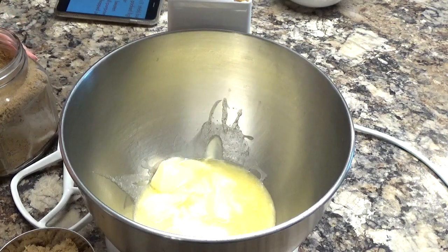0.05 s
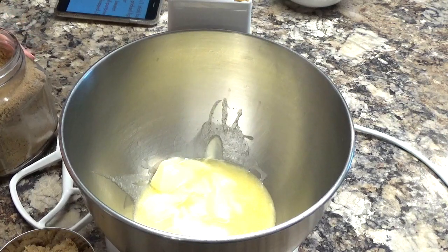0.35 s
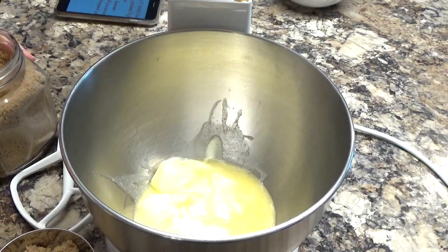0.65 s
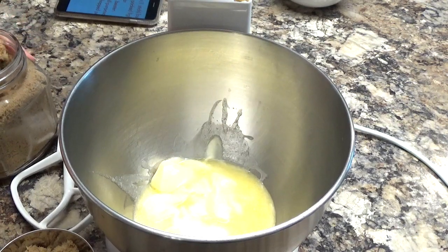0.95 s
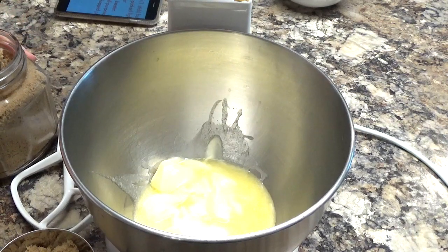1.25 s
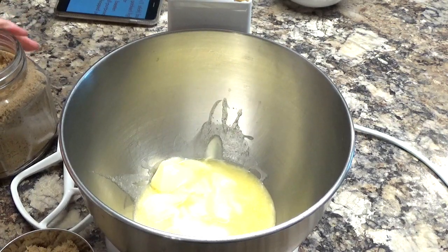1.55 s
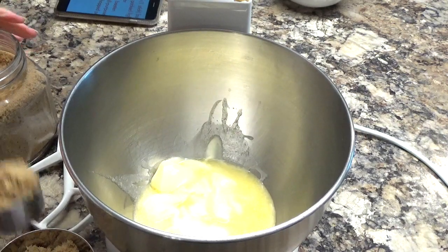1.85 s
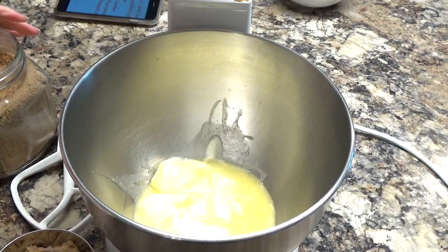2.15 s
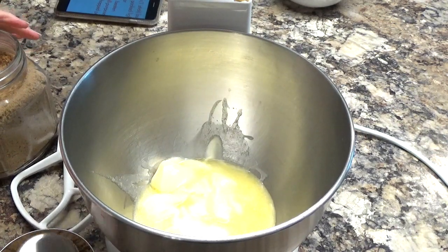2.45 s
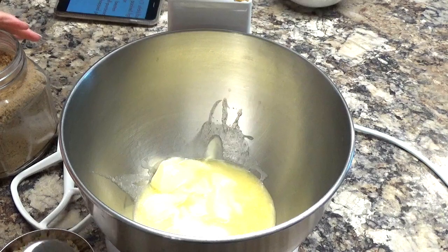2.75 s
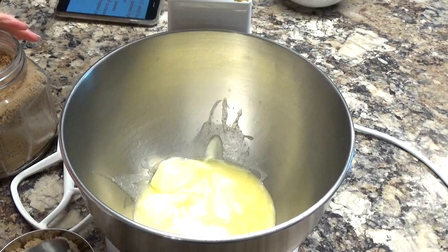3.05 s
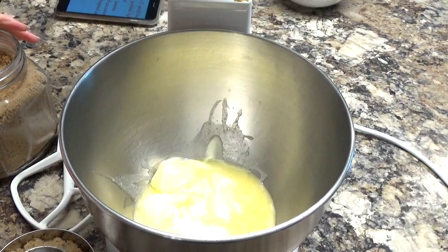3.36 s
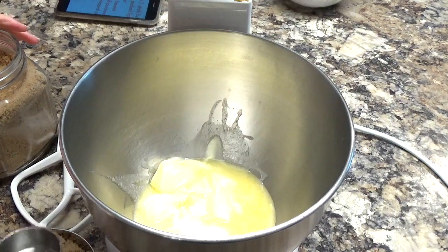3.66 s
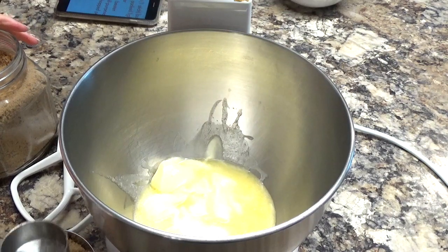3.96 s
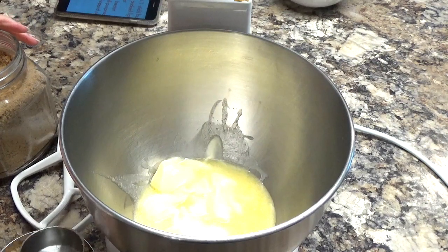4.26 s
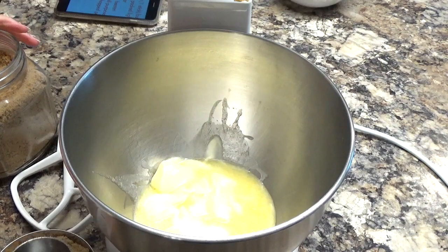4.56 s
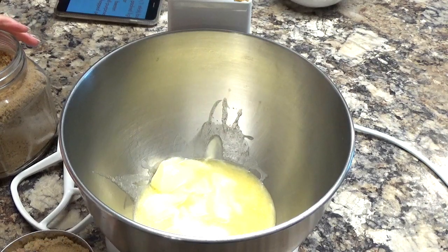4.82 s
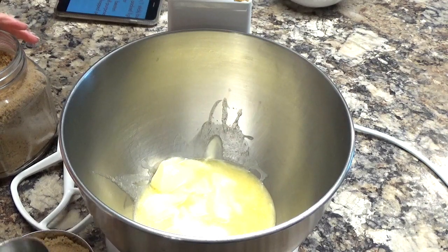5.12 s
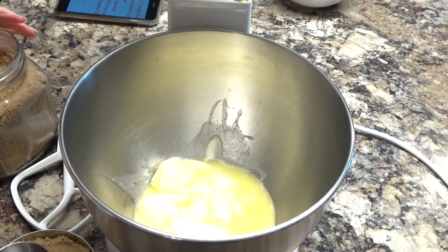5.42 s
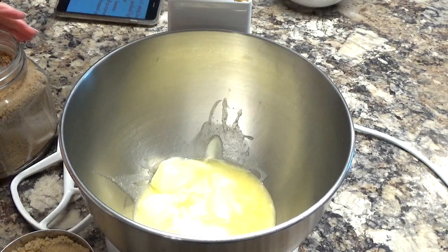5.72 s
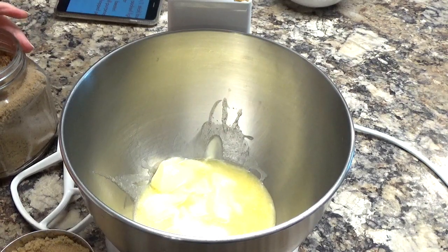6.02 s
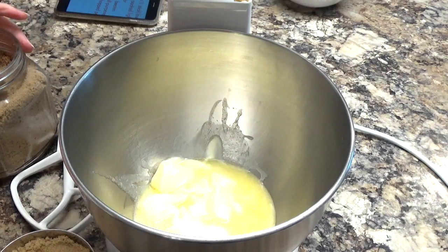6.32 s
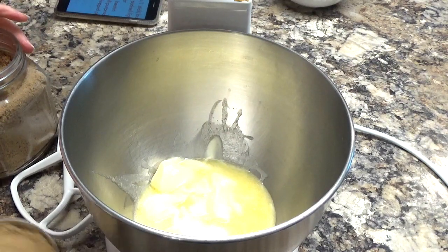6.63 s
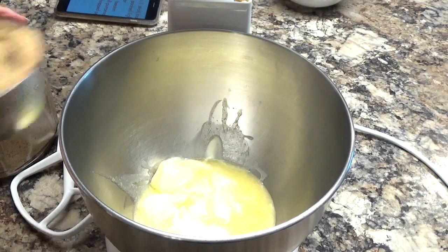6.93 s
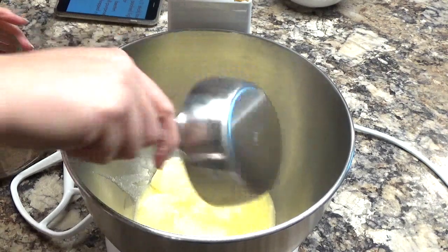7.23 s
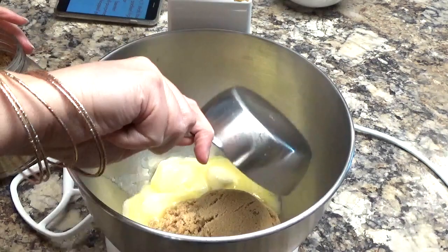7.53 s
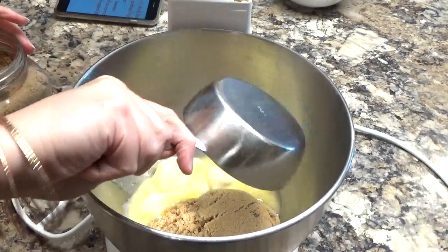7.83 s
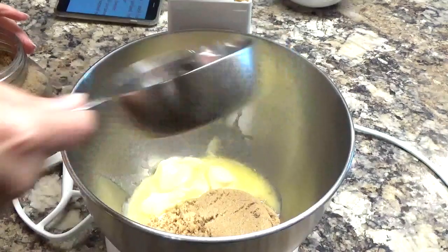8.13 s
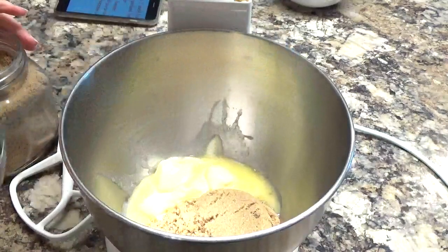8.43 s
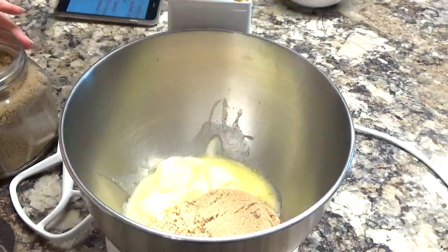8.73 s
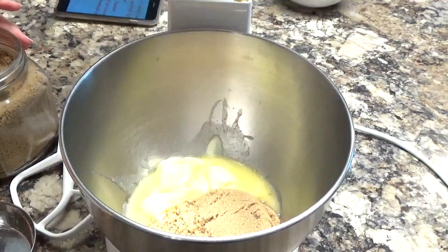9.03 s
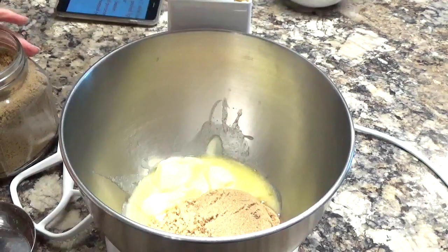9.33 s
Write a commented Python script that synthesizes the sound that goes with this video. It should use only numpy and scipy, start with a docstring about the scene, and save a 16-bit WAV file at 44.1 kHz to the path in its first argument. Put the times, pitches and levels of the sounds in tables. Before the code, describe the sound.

A steel measuring cup knocks, scrapes and clatters on a stone kitchen counter while thin bangles jingle and a glass jar thumps down.

```python
"""An appliance hums in a small kitchen. A steel measuring cup taps a glass jar of brown sugar, and the
jar thumps onto the stone counter. The cup clinks in its free modes; a scoop scrapes it by stick-slip
friction and grazes it, while thin bangles collide on the wrist. Pressed as the sugar is packed, the cup
knocks on the counter; it is tipped, and the sugar whispers out. At last the cup clatters down and rings.
The room reverberates throughout, and a limiter holds the loudest blows."""
import sys
import numpy as np
from scipy import signal
from scipy.fft import rfft, irfft, next_fast_len
from scipy.io import wavfile
from scipy.ndimage import uniform_filter1d, minimum_filter1d

SR = 44100
rng = np.random.default_rng(int(sys.argv[2]) if len(sys.argv) > 2 else 0)


def dump_mix(stems):
    """Bounce the given channels to the path in sys.argv[1] as a 16-bit WAV at rate SR."""
    frames = np.atleast_2d(stems).T  # one column per channel
    limited = np.clip(frames, -1, 1)  # hard clip at full scale
    pcm = np.round(limited * 32767).astype(np.int16)
    wavfile.write(sys.argv[1], SR, pcm)


N = 418068

# modes of the stone counter: (frequency [Hz], level [dB], t60 [s])
COUNTER_MODES = [(251, -6, 0.022), (332.4, -2.5, 0.13), (472, -6, 0.098), (662, -6, 0.048),
                 (857, -10.5, 0.034), (1132, -7.5, 0.022)]
# midrange clack of a blow on the counter: (frequency [Hz], spectral level [dB])
CLACK_SPECTRUM = [(120, -52), (300, -13), (650, 0.5), (1100, -1), (1700, -2.5), (2300, -2.5), (2900, -10.5),
                  (3300, -16.5), (6000, -24), (11000, -47)]
# bright crack of a hard contact: (frequency [Hz], spectral level [dB])
CRACK_SPECTRUM = [(500, -39), (2000, 8), (3700, 6), (5000, 4.5), (7000, 8), (9000, 4), (10000, -9),
                  (11000, -21)]
# modes of a middle-sized bangle: (frequency [Hz], level [dB], t60 [s])
BANGLE_MODES = [(2110, -23.5, 0.17), (4060, -14.5, 0.16), (6497, -2.5, 0.09), (9500, 3, 0.087)]
# pitch of each bangle against those modes: (frequency [ratio])
BANGLE_TUNINGS = [0.972, 0.987, 0.997, 1.007, 1.021, 1.032]
FIRM_DB, LOOSE_DB = .7, 3  # scatter of mode levels in firm blows and in loose touches


def amp(db):
    """Decibels as an amplitude ratio."""
    return np.exp(np.asarray(db) * (np.log(10) / 20))


def unit(x):
    """Normalisation to an rms of 1."""
    return x / np.sqrt(np.mean(x ** 2) + 1e-20)


def along(points, hz):
    """Interpolation of (frequency [Hz], value) points on a logarithmic axis."""
    frequencies, values = np.transpose(points)
    return np.interp(np.log(hz + 1), np.log(frequencies + 1), values)


def seconds(size):
    """Sample times [s]."""
    return np.arange(size) / SR


def pan(left_db):
    """A level difference between the channels sets the direction."""
    return amp([[left_db / 2], [-left_db / 2]])


def filtered(x, response):
    """Filtering multiplies the spectrum by a frequency response."""
    size = x.shape[-1]
    padded = next_fast_len(size + min(size // 8, 8192), real=True)
    hz = np.fft.rfftfreq(padded, 1 / SR)
    return irfft(rfft(x, padded) * response(hz), padded)[..., :size]


def noise(spectrum, size):
    """Spectral shaping turns white noise into coloured noise of rms 1."""
    return unit(filtered(rng.standard_normal(size), lambda hz: amp(along(spectrum, hz))))


def add(track, start_s, sound):
    """Superposition: a sound is summed into the track."""
    start = max(round(start_s * SR), 0)
    part = track[..., start:start + sound.shape[-1]]
    part += sound[..., :part.shape[-1]]


def ring(modes, scatter_db, size=SR // 3, tuning=1):
    """Free vibration is a sum of damped sinusoids; neighbouring modes start in opposite phase."""
    t = seconds(size)
    out = np.zeros(size)
    for k, (hz, db, t60) in enumerate(modes):
        envelope = amp(db + scatter_db * rng.standard_normal() - 60 * t / t60)
        out += (-1) ** k * envelope * np.sin(2 * np.pi * hz * tuning * t)
    return out


def burst(spectrum, t60, side_db, size=SR // 3):
    """Modes too dense to resolve act as decaying noise, mixed differently in each channel."""
    mid, side = noise(spectrum, (2, size)) * amp([[0], [side_db]])
    return unit(np.array([mid + side, mid - side])) * amp(-60 * seconds(size) / t60)


def ticks(size, uneven_db):
    """Many tiny contacts of uneven strength sum to a spiky random force."""
    return unit(rng.standard_normal(size) * amp(uneven_db * rng.exponential(size=size)))


def driven(force, response):
    """Forced vibration: the force is convolved with an impulse response scaled to unit energy."""
    response = np.atleast_2d(response)
    return signal.oaconvolve(force[None], response / np.linalg.norm(response[0]), axes=1)[:, :N]


def background():
    """Room noise, coherent between the channels in the bass, lies under an appliance's steady tones."""
    # room air: (frequency [Hz], spectral level [dB])
    air_spectrum = [(15, -77), (25, -25.5), (69, -7), (124, -1), (165, -16.5), (223, -18.5), (296, -11),
                    (444, -22.5), (480, -18), (545, -21.5), (759, -24), (1950, -34.5), (2210, -36),
                    (4990, -39.5), (11000, -44.5), (14300, -118), (22000, -120)]
    # likeness of left and right: (frequency [Hz], correlation [0-1])
    coherence = [(60, 0.99), (170, 1), (500, 0.95), (1430, 0.36), (4130, 0.5), (11900, 0.75)]
    # appliance tones: (frequency [Hz], rms level [dB])
    hum_tones = [(120, -52), (298, -65), (480, -62.5)]

    def mid_side_gains(hz):
        angle = np.arccos(np.clip(along(coherence, hz), -1, 1)) / 2
        return np.array([np.cos(angle), np.sin(angle)])

    mid, side = filtered(noise(air_spectrum, (2, N)), mid_side_gains)
    hum = sum(amp(db) * np.sqrt(2) * np.sin(2 * np.pi * hz * seconds(N)) for hz, db in hum_tones)
    return amp(-45.5) * np.array([mid + side, mid - side]) + hum


def glass_taps():
    """Inelastic rebound: the cup's rim taps the jar and touches twice more, each time more lightly."""
    # rim on glass: (time [s], level [dB], flight time [s])
    taps = [(0.385, -40.5, 0.0053), (0.532, -43, 0.0018), (5.227, -54.5, 0.0026), (5.408, -52, .003),
            (6.045, -19.5, 0.024), (9.274, -29.5, .012), (9.409, -26, 0.0083)]
    # resonances of the glass: (frequency [Hz], spectral level [dB])
    glass = [(500, -4.5), (1400, -6), (1690, 6), (1950, -22), (2300, 12.5), (2750, 8), (3100, -1),
             (5000, -11.5), (7000, -7.5), (9100, -1.5), (10500, -21)]
    fade_db_per_s = 312
    out = np.zeros((2, N))
    for start, db, flight in taps:
        for delay in (0, flight, 2 * flight):
            tap = burst(glass, t60=0.032, side_db=-14, size=SR // 10)
            add(out, start + delay, amp(db - fade_db_per_s * delay) * tap)
    return out


def jar():
    """Impact excitation: the heavy jar thuds in low, damped modes, with a clack and a glassy crack."""
    # it lands on its edge, falls flat and rocks back: (time [s], level [dB])
    blows = [(.848, -10), (0.8565, -5.5), (.869, 0)]
    # modes of the thud: (frequency [Hz], level [dB], t60 [s])
    thud_modes = [(88, -26, 0.19), (173, -49, 0.19), (257, -2, 0.028), (318, 2.5, 0.039),
                  (575, -8.5, 0.038), (770, -6, 0.013)]
    out = np.zeros((2, N))
    for start, db in blows:
        add(out, start, amp(db) * ring(thud_modes, FIRM_DB))
        add(out, start, amp(db - 17) * burst(CLACK_SPECTRUM, t60=0.042, side_db=-6))
        add(out, start, amp(-38.5) * burst(CRACK_SPECTRUM, t60=0.06, side_db=-8.5))
    return out


def contact(thud_db, clack_db, crack_db, clack_t60):
    """Steel's impact excites the counter's modes, pitched slightly at random; the treble dies first."""
    thud = ring(COUNTER_MODES, FIRM_DB, tuning=1 + 0.013 * rng.standard_normal())
    thud *= 1 - np.exp(-seconds(len(thud)) / 0.0012)
    clack = burst(CLACK_SPECTRUM, clack_t60, side_db=-9)
    crack = burst(CRACK_SPECTRUM, t60=0.0097, side_db=-7)
    return amp(thud_db) * thud + amp(clack_db) * clack + amp(crack_db) * crack


def drops():
    """Restitution: dropped steel bounces once, and the second contact rattles on."""
    # falls: (time [s], thud [dB], clack [dB], crack [dB], flight time [s], bounce gain [dB])
    falls = [(2.136, -18.5, -26.5, -7, 0.017, -4), (8.766, -21, -13.5, -23, .02, -1.5),
             (8.937, -17.5, -8.5, -14.5, .013, -8), (8.974, -14, -13, -20, .019, -9.5)]
    out = np.zeros((2, N))
    for start, thud_db, clack_db, crack_db, flight, bounce_db in falls:
        add(out, start, contact(thud_db, clack_db, crack_db, clack_t60=0.053))
        add(out, start + flight, amp(bounce_db) * contact(thud_db, clack_db, crack_db, clack_t60=0.34))
    return out


def cup_modes(place, t60_scale):
    """The point of excitation, from rim (0) to wall (1), weights the cup's modes."""
    # the empty cup: (frequency [Hz], level struck on rim [dB], level struck on wall [dB], t60 [s])
    modes = [(2460, -5, -1.5, 0.42), (3074, -36, 2.5, 1.47), (3620, -33, -7, .15), (3893, -25, -3, 0.61),
             (4636, -17.5, -17.5, 0.84), (5612, -15, -9.5, 0.52), (6266, -6.5, -45, 0.69),
             (6600, 6, -32, 0.15), (7510, -6, -16.5, 0.4), (8610, 2, -40, 0.36), (9776, -10.5, -36.5, 0.41),
             (10600, -12, -35, .3), (11080, -11.5, -48, 0.18)]
    return [(hz, rim + place * (wall - rim), t60 * t60_scale) for hz, rim, wall, t60 in modes]


def cup():
    """The struck cup vibrates freely; sugar inside adds damping and shortens the ring."""
    # blows: (time [s], level [dB], place [0 rim - 1 wall], left over right [dB], t60 scale [ratio])
    clinks = [(2.136, -17, 0.024, 3, 0.5), (8.767, -39, 1, 3, 0.87), (8.938, -27, 0.64, 4, 1.0),
              (8.975, -25, 0.99, 2, 0.97)]
    out = np.zeros((2, N))
    for start, db, place, left_db, t60_scale in clinks:
        add(out, start, amp(db) * pan(left_db) * ring(cup_modes(place, t60_scale), FIRM_DB, size=SR))
    return out


def scrapes():
    """Stick-slip friction: each slip rings the steel's dense modes and shakes what it rests on."""
    # scoop in cup, later bangles sliding: (time [s], length [s], level [dB], counter share [ratio])
    slides = [(2.397, 0.065, -33, .4), (2.599, 0.041, -36.5, .5), (7.423, 0.0018, -29.5, 0),
              (7.446, 0.038, -37.5, 0), (7.5, 0.0041, -27.5, 0)]
    # steel on steel: (frequency [Hz], spectral level [dB])
    steel_spectrum = [(300, -33), (1400, -21), (2200, -11), (4000, -9), (5600, -3.5), (6000, -3), (6500, 3),
                      (7300, 3.5), (9400, 0), (10500, -17.5)]
    out, t = np.zeros((2, N)), seconds(SR // 4)
    steel = burst(steel_spectrum, t60=0.068, side_db=-17)
    counter = burst(CLACK_SPECTRUM, t60=0.054, side_db=-7) + amp(1) * ring(COUNTER_MODES, FIRM_DB)
    for start, length, db, share in slides:
        release = amp(-60 * np.maximum(t - length, 0) / 0.015)
        slips = ticks(len(t), uneven_db=2) * release
        slips[0] = 9  # a firm first touch
        add(out, start, amp(db) * (driven(slips, steel) + share * driven(slips, counter)))
    return out


def chatter(modes, tunings, spread_s, fade_db, attack_s):
    """Repeated collisions: loose steel touches at random instants, ever more lightly."""
    out, t = np.zeros(SR // 2), seconds(SR // 7)
    lags = np.sort(rng.random(len(tunings)))
    lags[:2] = 0  # the first touch rings both partners
    swell = 1 - np.exp(-t / attack_s)  # the touch is glancing
    for lag, tuning in zip(lags, tunings):
        touch = ring(modes, LOOSE_DB, len(t), tuning)
        add(out, lag * spread_s, amp(-fade_db * lag) * swell * touch)
    return out


def bangles():
    """Pitch depends on size: slightly unequal bangles collide and jingle in clusters of close tones."""
    # jerks of the wrist: (time [s], relative level [dB])
    jerks = [(2.415, -30), (2.615, -39), (4.772, -47), (5.187, -46.5), (5.7195, -36), (5.9683, -33),
             (6.2957, -43.5), (6.4953, -29), (6.6418, -41), (6.797, -41.5), (7.02, -34.5), (7.4525, -30.5),
             (7.5053, -27.5), (7.7393, -34.5), (8.0227, -41.5), (8.2107, -30.5), (8.487, -39.5),
             (8.6264, -35), (9.235, -45)]
    out = np.zeros((2, N))
    for start, db in jerks:
        force = np.clip((db + 42) / 14, 0, 1)  # 0 = a light shake, 1 = the whole stack collides
        tunings = rng.permutation(np.repeat(BANGLE_TUNINGS, 2))
        tunings *= 1 + 0.0052 * rng.standard_normal(len(tunings))
        jingle = chatter(BANGLE_MODES, tunings, spread_s=.055, fade_db=17 + 1.5 * force, attack_s=9.4e-5)
        crack = burst(CRACK_SPECTRUM, t60=0.056, side_db=1, size=SR // 10)
        add(out, start, amp(db - 7.5) * jingle)
        add(out, start, force * amp(db - 15) * crack)
    return out


def scoop():
    """Damping by the hand keeps the scoop's ring short as it grazes the cup."""
    # glancing touches: (time [s], relative level [dB])
    grazes = [(2.7586, -33.5), (3.263, -33), (3.7115, -33.5), (4.144, -33), (4.485, -41), (4.7627, -29),
              (4.9708, -30), (5.2061, -37)]
    # the held scoop: (frequency [Hz], level [dB], t60 [s])
    modes = [(4340, -24.5, 0.17), (8130, -6, 0.042), (8380, 0, 0.013)]
    out = np.zeros(N)
    for start, db in grazes:
        tunings = 1 + 0.0139 * rng.standard_normal(6)
        ting = chatter(modes, tunings, spread_s=0.035, fade_db=34, attack_s=0.0013)
        add(out, start, amp(db - 3.5) * ting)
    return out


def presses():
    """Rocking impact: the pressed cup knocks on the counter and may rock back, damped by the hand."""
    # cup on stone: (time [s], thud [dB], clack [dB], crack [dB], strength of the rock back [0-1])
    knocks = [(3.759, -41.5, -48.5, -52, 0.56), (4.488, -23, -37, -62, 0.58), (4.768, -22.5, -39, -37.5, 0),
              (4.973, -14.5, -30.5, -34, 0), (5.21, -28.5, -34, -64, 1), (5.39, -27.5, -36, -61, 1),
              (6.045, -23.5, -46, -52, 0.8), (9.414, -29, -50, -56, 0)]
    rock_s = .017
    out = np.zeros((2, N))
    for start, thud_db, clack_db, crack_db, rock in knocks:
        for delay, strength in ((0, 1), (rock_s, rock)):
            add(out, start + delay, strength * contact(thud_db, clack_db, crack_db, clack_t60=0.032))
    return out


def bangle_rustle():
    """A Poisson stream of light touches excites each bangle while the arm moves."""
    # strength of the arm's motion: (time [s], level [dB])
    arm_levels = [(5.88, -58.5), (5.951, -52.5), (6.1, -45), (6.24, -65), (6.35, -52), (6.48, -51.5),
                  (6.73, -75), (6.93, -49.5), (7.03, -48), (7.15, -69), (7.41, -48), (7.58, -48),
                  (7.68, -68), (8.15, -62), (8.7, -57.5), (8.85, -75)]
    touches_per_s = 13
    motion = amp(np.interp(seconds(N), *np.transpose(arm_levels), left=-120))
    out = np.zeros((1, N))
    for tuning in BANGLE_TUNINGS:
        touches = unit((rng.random(N) < touches_per_s / SR).astype(float))
        hoop = ring(BANGLE_MODES, FIRM_DB, SR // 5, tuning)
        swell = 1 - np.exp(-seconds(len(hoop)) / .0004)
        out += driven(motion * touches, hoop * swell)
    return out / np.sqrt(len(BANGLE_TUNINGS))


def sugar():
    """Granular flow: damp crystals whisper out of the tipped cup and faintly drive its wall."""
    # strength of the flow: (time [s], relative level [dB])
    flow_levels = [(7.22, -69), (7.29, -55), (7.36, -60), (7.42, -47), (7.56, -77)]
    # colour of the grain contacts: (frequency [Hz], spectral level [dB])
    grain_spectrum = [(300, -20), (2500, -5), (7500, 9), (11000, 2)]
    flow = amp(np.interp(seconds(N), *np.transpose(flow_levels), left=-120, right=-120))
    grains = flow * unit(filtered(ticks(N, uneven_db=-3), lambda hz: amp(along(grain_spectrum, hz))))
    wall = ring(cup_modes(place=0.73, t60_scale=.5), FIRM_DB)
    return amp(-1.5) * grains + amp(-10.5) * driven(grains, wall)


def handle():
    """The cup's flat handle slaps down and vibrates in natural modes of its own."""
    # slaps: (time [s], level [dB], tuning [ratio])
    slaps = [(8.765, -16.5, 1.0), (8.937, -21, 1.012)]
    # the handle: (frequency [Hz], level [dB], t60 [s])
    modes = [(633, -5, 0.43), (1300, -9, 0.27), (1562, 0.5, 0.16), (1755, -5, 0.44), (1880, -10, 0.45),
             (6100, -5, 0.09), (6100, -17.5, 0.51), (9000, -9.5, 0.2), (10470, -22.5, 0.32)]
    out = np.zeros((2, N))
    for start, db, tuning in slaps:
        add(out, start, amp(db) * ring(modes, FIRM_DB, size=SR, tuning=tuning))
    return out


def kitchen(direct):
    """Reverberation: a diffuse tail decays band by band; long waves reach both channels alike."""
    # reverberation time: (frequency [Hz], t60 [s])
    decay_times = [(150, 0.36), (500, 0.4), (2000, 0.47), (6000, 0.42), (11000, 0.21)]
    # colour of the reverberation: (frequency [Hz], gain [dB])
    tail_gains = [(150, -7.5), (400, -13), (1200, -5), (3000, -15), (10000, -7.5)]
    hz, t, bands = signal.stft(rng.standard_normal((2, SR // 2)), SR, nperseg=256)
    decay = amp(-60 * t / along(decay_times, hz)[:, None])
    tail = signal.istft(bands * decay, SR, nperseg=256)[1]
    mid, side = filtered(tail / np.linalg.norm(tail[0]), lambda f: amp(along(tail_gains, f)))
    side = filtered(side, lambda f: amp(-5.5) * f / np.hypot(f, 550))
    response = np.pad([mid + side, mid - side], ((0, 0), (SR // 200, 0)))  # arrives 5 ms late
    return signal.oaconvolve(direct.mean(axis=0)[None], response, axes=1)[:, :N]


def scene():
    """Superposition of close sources near the middle, their reverberation and the background."""
    counter_side = pan(left_db=-.8) * (jar() + glass_taps() + presses() + drops())
    wrist_side = pan(left_db=1) * (scoop() + bangles() + bangle_rustle() + scrapes() + sugar())
    direct = cup() + handle() + counter_side + wrist_side
    return direct + kitchen(direct) + background()


def limiter(x, ceiling_db, hold_s):
    """Look-ahead limiting: the gain ducks just before a peak and is held down briefly."""
    needed_gain = np.minimum(1, amp(ceiling_db) / (np.abs(x).max(axis=0) + 1e-9))
    window = 2 * int(hold_s * SR / 2) + 1
    held_gain = minimum_filter1d(needed_gain, window, origin=window // 2 - 32)
    return x * uniform_filter1d(held_gain, size=64)


def record(dry):
    """Peak limiting, then band limiting: the deepest bass is thinned and the top cut off steeply."""
    low_hz, top_hz = 30, 11100
    limited = limiter(dry, ceiling_db=-5.5, hold_s=.005)
    passband = lambda hz: hz ** 2 / (hz ** 2 + low_hz ** 2) / np.sqrt(1 + (hz / top_hz) ** 160)
    return filtered(limited, passband)


dry = scene()
out = record(dry)
dump_mix(out)
```